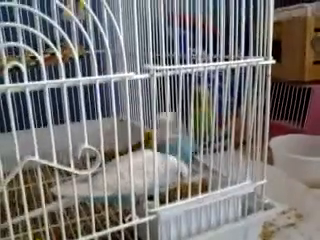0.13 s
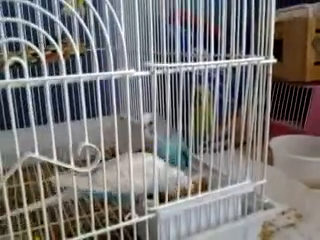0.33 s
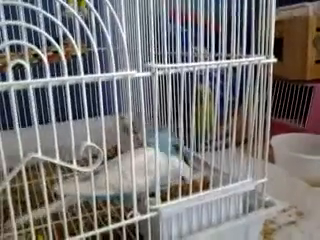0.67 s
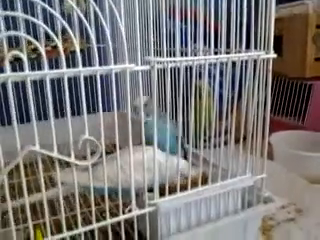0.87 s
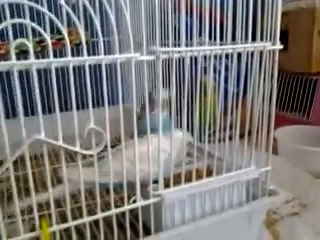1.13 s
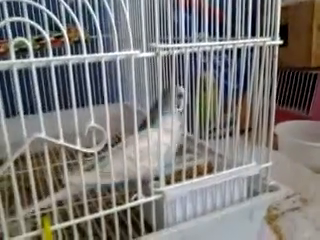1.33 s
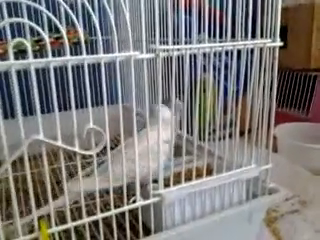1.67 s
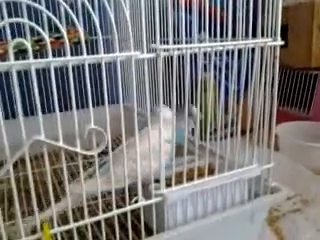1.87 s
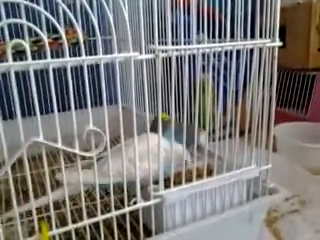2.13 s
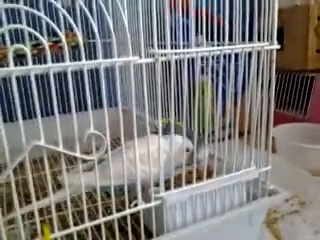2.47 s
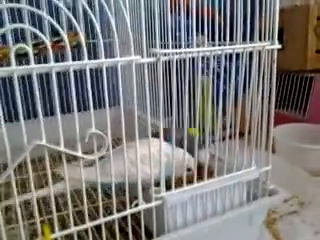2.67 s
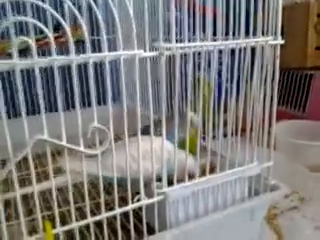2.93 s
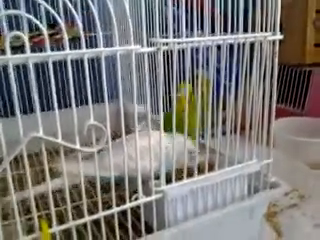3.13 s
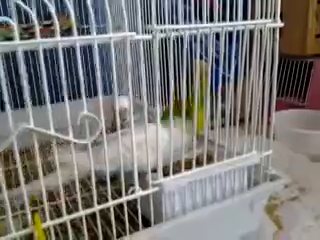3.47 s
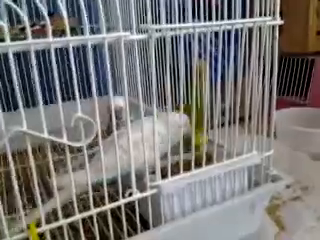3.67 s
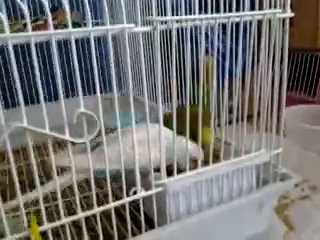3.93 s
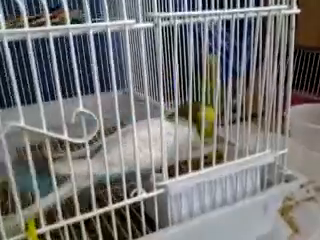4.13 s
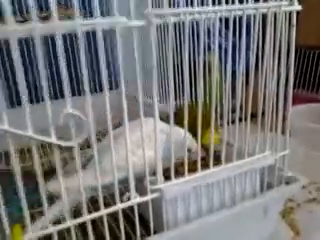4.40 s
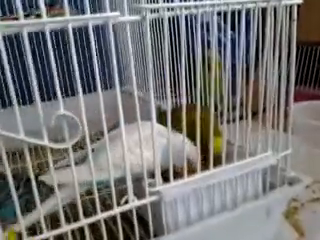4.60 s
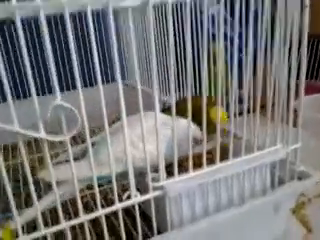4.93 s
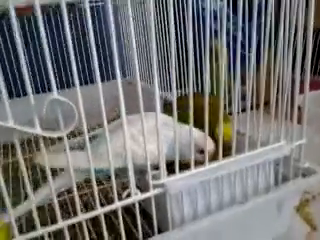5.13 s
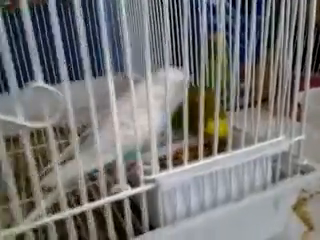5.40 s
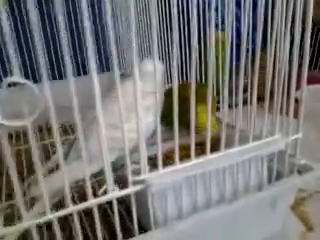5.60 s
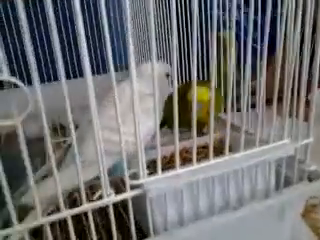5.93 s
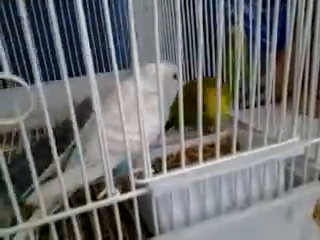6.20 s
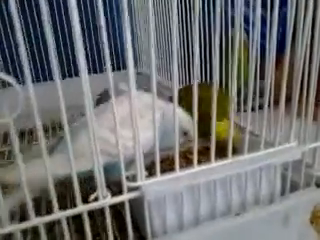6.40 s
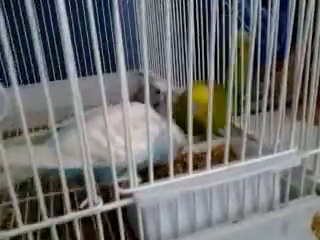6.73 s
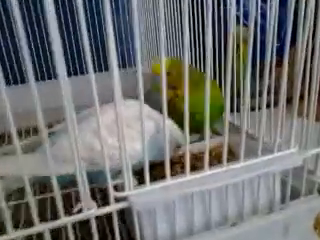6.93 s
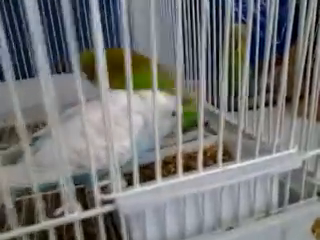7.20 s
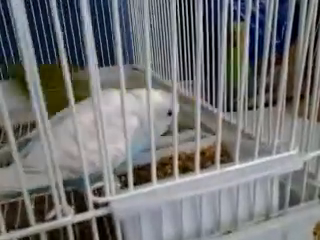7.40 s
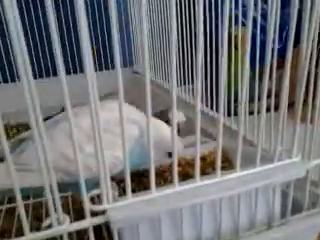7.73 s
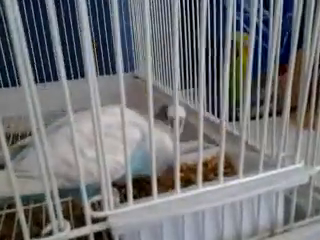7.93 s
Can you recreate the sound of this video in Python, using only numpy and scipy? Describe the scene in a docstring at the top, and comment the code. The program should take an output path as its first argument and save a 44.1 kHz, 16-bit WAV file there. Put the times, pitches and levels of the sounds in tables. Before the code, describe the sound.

A fan's draught and low hum run throughout in a quiet room. Close by, budgerigars feed in a wire cage, splitting seeds with dry clicks and faint crumbling ticks. The hand-held microphone rustles and rumbles softly at the start. Sharp beak snaps at about 0.4, 0.8, 1.1 and 1.2 seconds are the loudest sounds, mixed with short, quiet raspy chucks and soft bumps on the plastic tray between 0.8 and 1.3 seconds. Seed cracks come often until 3.8 seconds, with another bump at 2.2 and a lighter snap at 2.8. Around 4.5 seconds there is faint handling noise, a chuck and a small snap. At 5.6 seconds one brief squeak rises and falls, breaking hoarse, followed by a chuck. Crisper cracks stand out at 6, 6.4 and 7.1 seconds, and a soft handling rustle returns near 7.7.

```python
"""Budgerigars feeding at a plastic dish in a wire cage, close to a hand-held phone in a quiet room.
Seeds split with a click and crumble, beaks snap and knock the dish, and soft bumps ring the cage tray.
The birds give short raspy chucks and one arched squeak that breaks hoarse as it falls.
Soft rustles and handling rumble come and go at the microphone, over a fan and its mains hum."""
import sys
import numpy as np
from scipy import signal
from scipy.fft import rfft, irfft
from scipy.io import wavfile
from scipy.ndimage import uniform_filter1d

SR = 44100
rng = np.random.default_rng(int(sys.argv[2]) if len(sys.argv) > 2 else 0)


def unload_wav(signal):
    """Save mono or channel-first audio to the path in sys.argv[1] as 16-bit WAV at rate SR, clipped to [-1, 1]."""
    wavfile.write(
        sys.argv[1],
        SR,
        np.round(np.clip(np.atleast_2d(signal).T, -1, 1) * 32767).astype(np.int16),
    )


N = 355798
T = np.arange(N) / SR
FREQS = np.fft.rfftfreq(N, 1 / SR)

# The air of the room. Each row: frequency in Hz, relative level in dB.
AIR_SPECTRUM = [(20, 3), (55, -11.5), (75, -6), (95, -4), (200, -13.5), (345, -7.5), (500, -15), (820, -9),
                (960, -12.5), (1420, -8.5), (2100, -12.5), (3000, -14.5), (4400, -21), (7000, -33.5)]
# Resonances in the fan's draught. Each row: centre in Hz, nominal width in Hz, level in dB.
FAN_MODES = [(60.6, 5, -64), (141.9, 4.5, -67.5), (266.2, 4.2, -67.5), (317.8, 8.1, -68.5),
             (439.7, 3.1, -73), (572.7, 12, -68), (1404, 150, -64.5), (3163, 32, -75), (5790, 1000, -65.5)]
# The fan's strongest resonance swells and sinks. Each row: time in seconds, gain in dB.
WHIRR_SWELL = [(0.0, -2), (1.6, -3.5), (2.25, -3), (2.85, -3), (3.2, -7), (3.8, -4), (4.7, -4.5),
               (4.95, -1.5), (5.3, -5), (5.85, -10.5), (6.5, -3.5), (7.0, -3.5), (7.3, 3), (7.7, -5.5),
               (8.05, -5.5)]
# Hum of the fan's motor and the mains. Each row: frequency in Hz, level in dB.
HUM_TONES = [(21, -66), (26.4, -66), (40.3, -65.5), (62, -59), (120, -61.5)]
# Brief brushes at the phone. Each row: start in seconds, level in dB, decay in seconds, hollowness 0-1.
BRUSHES = [(0.009, -41, 0.022, 0.3), (0.0215, -35, 0.0042, 0.8), (.108, -43, 0.019, 0.2),
           (0.162, -36, 0.0077, 0.1), (0.27, -40.5, 0.007, 0.2), (1.733, -47, 0.043, 0.4),
           (4.284, -45, .07, 0.75), (6.148, -45.5, 0.043, 0.8), (7.7, -40.5, 0.043, 0.84),
           (7.850, -49, 0.03, 0.6)]
# The colour of rubbing. Each row: frequency in Hz, relative level in dB.
RUB_SPECTRUM = [(100, -9), (300, -10.5), (600, 2), (900, -3.5), (1300, 1.5), (1800, -2.5), (2550, -8),
                (3100, -18.5), (4500, -17.5), (7000, -24.5)]
# The phone's hollow case. Each row: centre in Hz, width in Hz, gain in dB.
CASE_MODES = [(660, 140, -7.5), (1245, 480, -2)]
# The hand shifts its grip. Each row: start in seconds, hold in seconds, boom in dB, rubbing in dB.
GRIP_SHIFTS = [(0.007, 0.041, -46, -46.5), (0.134, 0.2, -54, -49), (4.36, 0.45, -58, -59.5),
               (7.715, 0.19, -55, -58.5)]
# A bird bumps the cage. Each row: start in seconds, peak in dB.
CAGE_BUMPS = [(.807, -36.5), (1.101, -45), (1.322, -48), (2.236, -43)]
# The tray under the cage. Each row: centre in Hz, width in Hz, gain in dB.
TRAY_MODES = [(96, 28, 2), (217, 40, 2.5), (385, 20, 5), (960, 78, -2)]
# Raspy chucks. Each row: middle in seconds, level in dB, peep in dB relative to that level.
CHUCK_CALLS = [(0.816, -43, -5), (.835, -45.5, -4), (0.904, -41, -4), (0.950, -46, -5), (1.143, -46, 2.5),
               (2.24, -50.5, -2), (4.472, -45, 1), (5.651, -43, 3.5)]
# The throat in a chuck. Each row: centre in Hz, width in Hz, gain in dB.
THROAT_MODES = [(2200, 740, 1.5), (4420, 5600, -6.5)]
# The squeak's whistle. Each row: harmonic number, gain in dB.
WHISTLE_HARMONICS = [(1, -2.5), (2, -0.5), (3, -10), (4, -9.5), (5, -15)]
# The squeak's broken voice. Each row: harmonic number, gain in dB.
HOARSE_HARMONICS = [(1, -8), (2, -3), (3, -2), (4, -5), (5, -4)]
# Beak snaps. Each row: start in seconds, level in dB, treble tilt in dB per octave, pitch ratio,
# dish knock in dB relative to the snap, second touch as a share of the first.
BEAK_SNAPS = [(0.378, -20.5, -15, 1.2, -30, 0), (0.8072, -17.5, 2, 0.87, -32, 0),
              (1.0971, -14.5, 5, 1.07, -18.5, 1.25), (1.1964, -17, -3, 0.89, -32, 0),
              (2.2352, -30, -1, 0.88, -24, 0), (2.782, -29, -6, 1.05, -20, 0.21),
              (4.6203, -30, -14, 0.87, -25, 0)]
# The open beak. Each row: centre in Hz, width in Hz, gain in dB.
BEAK_MODES = [(1550, 480, -8.5), (2500, 540, 0), (4160, 390, 0), (5230, 340, -0.5), (6750, 820, -13)]
# Seeds cracking in a beak. Each row: start in seconds, level in dB,
# crumbs in dB relative to the first click, treble tilt in dB per octave.
SEED_CRACKS = [(.785, -34.5, -20, 0), (1.307, -36, -13, -4), (1.457, -34, -18, -1), (1.477, -44, -20, 3),
               (1.632, -41, -13, 3), (1.718, -38, -17.5, 3), (2.236, -38, -15, 0), (2.444, -36.5, -7, -4),
               (2.674, -32.5, -18, 7), (2.779, -38.5, -15, -9), (2.826, -36, -12, -4),
               (2.921, -31.5, -13, -1.5), (3.134, -41, -16, 2), (3.234, -37, -17, -1),
               (3.335, -35.5, -9, 0), (3.801, -34, -22, 0), (5.063, -32.5, -20, -4.5),
               (5.425, -34.5, -17.5, -4), (5.998, -25.5, -28, 7), (6.395, -39.5, -14, 2),
               (6.447, -23, -22.5, 0), (7.1128, -28, -32, -1), (7.470, -35, -20, -3)]
# A seed's husk. Each row: centre in Hz, width in Hz, gain in dB.
HUSK_MODES = [(1680, 710, -6.5), (3330, 380, -3), (5600, 1100, -0.5), (7700, 400, -5.5)]


def undb(db):
    """Decibels to gain."""
    return 10 ** (np.asarray(db) / 20)


def unit(x):
    """Scale to rms 1."""
    return x / np.std(x)


def noise():
    """White noise for the whole scene."""
    return rng.standard_normal(N)


def drift(rate_hz):
    """A smooth random drift with a spread near 1."""
    span = int(SR / rate_hz)
    steps = np.repeat(rng.standard_normal(N // span + 1), span)
    return 1.5 * uniform_filter1d(uniform_filter1d(steps, span), span)[:N]


def wander(x, drift_hz, rate_hz):
    """Let the pitch of x drift up and down."""
    phase = 2 * np.pi * np.cumsum(drift_hz * drift(rate_hz)) / SR
    return np.real(signal.hilbert(x) * np.exp(1j * phase))


def colour(x, points):
    """Filter x by a curve of (Hz, dB) points, at rms 1."""
    hz, db = np.transpose(points)
    gain = undb(np.interp(np.log(FREQS + 1), np.log(hz), db))
    return unit(irfft(rfft(x) * gain, N))


def ring(x, hz, width):
    """One resonance, gain 1 at its centre."""
    return signal.lfilter(*signal.iirpeak(hz, hz / width, fs=SR), x)


def noise_band(hz, width):
    """Noise passed twice through a resonance for steep skirts, at rms 1."""
    return unit(ring(ring(noise(), hz, width), hz, width))


def body(x, modes, tilt_db=0, sign=-1):
    """Resonances side by side; alternate signs keep the valleys shallow, like signs hollow them out."""
    return sum(sign ** k * undb(db + tilt_db * np.log2(hz / modes[0][0])) * ring(x, hz, width)
               for k, (hz, width, db) in enumerate(modes))


def grains(per_s, spread_db, size):
    """Random tiny impacts of uneven strength."""
    hit = rng.random(size) < per_s / SR
    return hit * rng.choice([-1, 1], size) * undb(spread_db * np.minimum(rng.exponential(size=size), 3))


def envelope(start, rise_s, decay_s, hold_s=0):
    """A straight rise, a hold and an exponential decay."""
    rise = np.clip((T - start) / rise_s, 0, 1)
    return rise * np.exp(-np.maximum(T - start - rise_s - hold_s, 0) / decay_s)


def add(out, start, x):
    """Mix x into out from a start in seconds."""
    i = int(start * SR)
    out[i:i + len(x)] += x[:N - i]


def room_air(level_db=-48.5):
    """An even draught; nearby surfaces return it milliseconds late and ripple its spectrum."""
    draught = noise()
    echoes = sum(np.roll(draught, int(lag_s * SR)) for lag_s in rng.uniform(.004, .03, size=4))
    return undb(level_db) * colour(draught + .11 * echoes, AIR_SPECTRUM)


def fan(whirr_db=-55.5):
    """The fan's draught excites wavering resonances, one whirring above the rest; motor and mains hum."""
    modes = sum(undb(db + 2 * drift(2.975)) * noise_band(hz, 2 * width) for hz, width, db in FAN_MODES)
    swell_db = np.interp(T, *np.transpose(WHIRR_SWELL)) + 0.7 * drift(2.7)
    whirr = wander(noise_band(hz=755, width=87), drift_hz=9, rate_hz=4)
    hum = sum(undb(db + 1.26 * drift(7.4)) * np.sin(2 * np.pi * (hz * T + rng.random()))
              for hz, db in HUM_TONES)
    return modes + undb(whirr_db + swell_db) * whirr + np.sqrt(2) * hum


def walls(x, t60_s=0.027, wet_db=-16, size=16000):
    """The short diffuse tail of a furnished room, faint this close to the cage."""
    t = T[:size]
    tail = rng.standard_normal(size) * np.exp(-np.log(1000) * t / t60_s) * (t > .003)
    return x + undb(wet_db) * signal.fftconvolve(x, tail / np.linalg.norm(tail))[:N]


def handling():
    """Dense slips, crisp or hollow as they ring the phone's case; a shift of grip rubs and booms."""
    slips = colour(grains(per_s=9000, spread_db=1.5, size=N), RUB_SPECTRUM)
    hollow = unit(sum(undb(db) * noise_band(hz, width) for hz, width, db in CASE_MODES))
    boom = noise_band(hz=145, width=36)
    out = np.zeros(N)
    for start, db, decay_s, hollowness in BRUSHES:
        brush = np.sqrt(1 - hollowness) * slips + np.sqrt(hollowness) * hollow
        out += undb(db) * envelope(start, rise_s=0.3 * decay_s, decay_s=decay_s) * brush
    for start, hold_s, boom_db, rub_db in GRIP_SHIFTS:
        grip = envelope(start, rise_s=0.029, decay_s=0.069, hold_s=hold_s)
        out += grip * (undb(boom_db) * boom + undb(rub_db) * slips)
    return out


def cage_bumps():
    """A bird's soft blows ring the plastic tray under the cage."""
    out = np.zeros(N)
    thud = body(signal.unit_impulse(SR // 4), TRAY_MODES)
    for start, db in CAGE_BUMPS:
        add(out, start, undb(db) * thud / np.abs(thud).max())
    return out


def chucks(gain_db=-0.5, half_length_s=0.0057, flutter=0.16):
    """Short puffs of fluttering rasp through the throat's resonances, some with a clear peep on top."""
    rasp = sum(undb(db) * noise_band(hz, width) for hz, width, db in THROAT_MODES)
    peep = noise_band(hz=4410, width=740)
    out = np.zeros(N)
    for middle, db, peep_db in CHUCK_CALLS:
        puff = np.exp(-np.abs((T - middle) / half_length_s) ** 2.2 / 2)
        out += undb(db + gain_db) * puff * (rasp + undb(peep_db) * peep)
    return out * (1 + flutter * drift(900))


def squeak(top_s=5.5715, top_hz=1657, glide_hz_per_s=17000, arch_s=0.0054, swell_s=0.0083, fade_s=0.016,
           overtone_rise_s=0.0076, whistle_db=-34, rasp_db=-41.5, hoarse_db=-43):
    """An arched whistle whose overtones grow until it breaks into hoarse rasp as it falls."""
    t, break_s = T - top_s, top_s + 0.005
    broken = uniform_filter1d(1. * (T > break_s), size=80)
    # the pitch arch has a rounded top and straight flanks
    hz = np.maximum(top_hz - glide_hz_per_s * (np.hypot(t, arch_s) - arch_s), top_hz / 2)
    jitter = (0.0116 + 0.0052 * broken) * drift(1200)
    phase = 2 * np.pi * np.cumsum(hz * (1 + jitter)) / SR
    growth = np.exp(np.minimum(T - break_s, 0) / overtone_rise_s)
    overtones = (1 - broken) * undb(2) * growth + broken * undb(-13)
    whistle = sum(undb(db) * (overtones if k > 1 else 1) * np.sin(k * phase)
                  for k, db in WHISTLE_HARMONICS)
    # once broken, the syrinx swings unevenly from cycle to cycle
    whistle *= 1 + 0.22 * broken * drift(1500)
    hoarse = sum(undb(db) * np.sin(k * phase) for k, db in HOARSE_HARMONICS)
    hoarse = unit(hoarse * (1 + 0.51 * drift(1500)))
    rasp = colour(noise(),
                  [(400, -18), (1200, -24), (2800, 5), (4400, 2), (5300, 5), (6400, 5), (7500, -14)])
    effort = np.exp(-.5 * (t / np.where(t < 0, swell_s, fade_s)) ** 2)
    rough = undb(rasp_db) * rasp + undb(hoarse_db) * hoarse
    fall = envelope(break_s, rise_s=0.016, decay_s=0.023) * rough
    return np.sqrt(2) * undb(whistle_db) * effort * whistle + fall


def beak_snaps(dish_hz=800, dish_s=0.001, scrape=0.051, scrape_s=0.0025, touch_gap_s=0.00075, size=1500):
    """A beak snaps with a hollow ring and a brief scrape; the plastic dish answers with a dull knock."""
    out, t = np.zeros(N), T[:size]
    knock = np.sin(2 * np.pi * dish_hz * t) * t / dish_s * np.exp(1 - t / dish_s)
    for start, db, tilt_db, pitch, knock_db, second_touch in BEAK_SNAPS:
        force = scrape * rng.standard_normal(size) * np.exp(-t / scrape_s)
        force[0] = 1
        force[int(touch_gap_s * SR)] += second_touch  # the beak's halves can meet twice
        modes = [(hz * pitch, width, gain) for hz, width, gain in BEAK_MODES]
        click = body(force, modes, tilt_db, sign=0.77)
        add(out, start, undb(db) * (click / np.abs(click).max() + undb(knock_db) * knock))
    return out


def nibbling(level_db=-66):
    """Faint husk ticks in loose bouts."""
    bouts = undb(2.5 * drift(6))
    ticks = grains(per_s=170, spread_db=-4, size=N)
    return undb(level_db) * unit(body(bouts * ticks, HUSK_MODES))


def seed_cracks(gain_db=1, crumble_rise_s=0.0014, crumble_decay_s=0.016, size=4000):
    """A husk splits with one click, then crumbles in smaller ones; each seed's size sets its pitch."""
    out, t = np.zeros(N), T[:size]
    crumbling = np.minimum(t / crumble_rise_s, 1) * np.exp(-t / crumble_decay_s)
    for start, db, crumbs_db, tilt_db in SEED_CRACKS:
        force = undb(crumbs_db) * grains(per_s=2200, spread_db=5.5, size=size) * crumbling
        force[0] = 1  # the split
        pitch = 1 + .05 * rng.standard_normal()
        modes = [(hz * pitch, width, gain) for hz, width, gain in HUSK_MODES]
        crack = body(force, modes, tilt_db)
        add(out, start + .0005, undb(db + gain_db) * crack / np.abs(crack).max())
    return out


def scene():
    """The birds close up, in mono, with handling noise at the phone and the room behind."""
    birds = seed_cracks() + nibbling() + beak_snaps() + cage_bumps() + chucks() + squeak()
    return (walls(birds) + handling() + room_air() + fan())[None]


def record(dry):
    """The sound is muted above a steep treble cut near 7.2 kHz."""
    treble_cut = signal.firwin(501, cutoff=7230, window="blackman", fs=SR)
    return signal.fftconvolve(dry, treble_cut[None], mode="same")


dry = scene()
out = record(dry)
unload_wav(out)
```